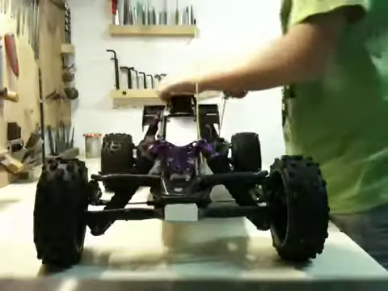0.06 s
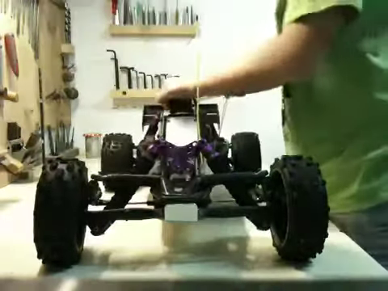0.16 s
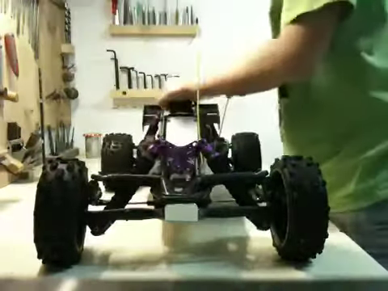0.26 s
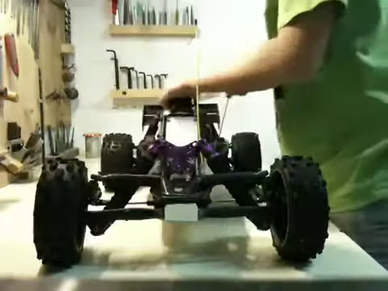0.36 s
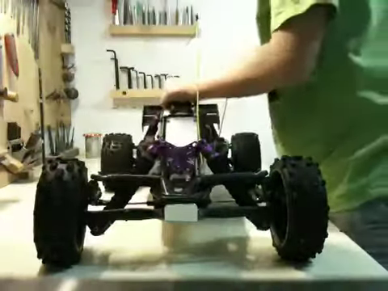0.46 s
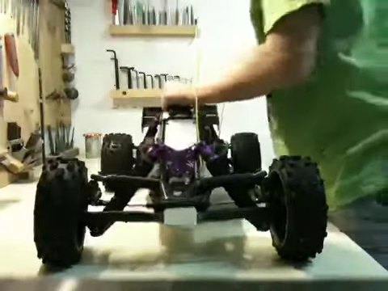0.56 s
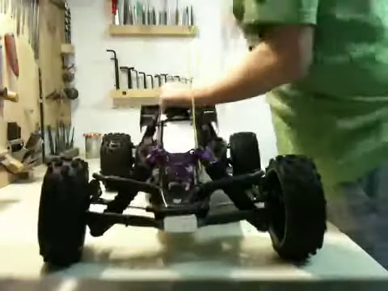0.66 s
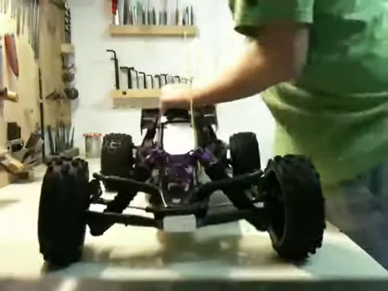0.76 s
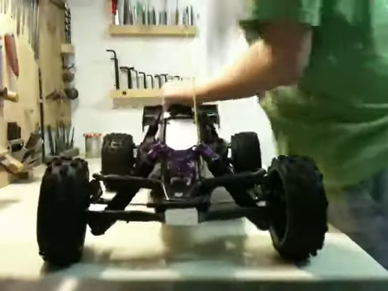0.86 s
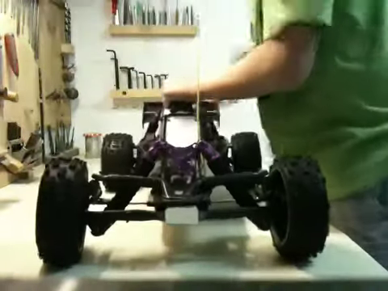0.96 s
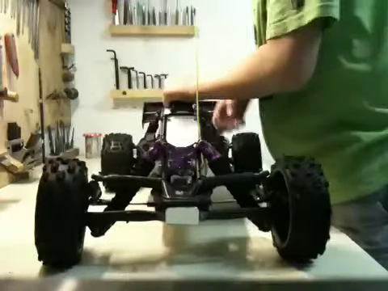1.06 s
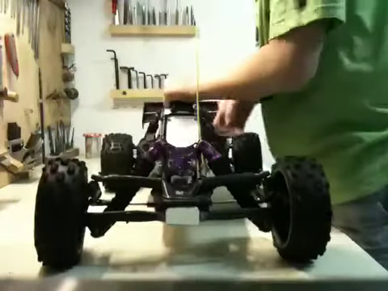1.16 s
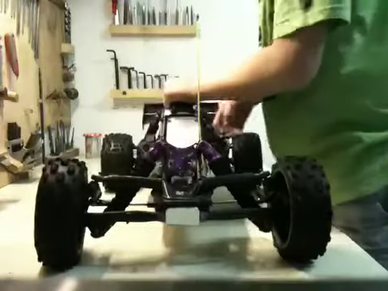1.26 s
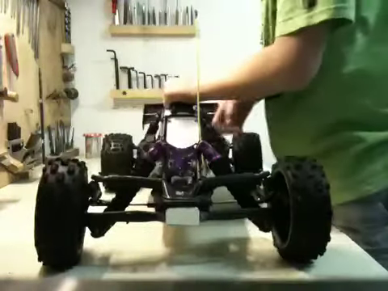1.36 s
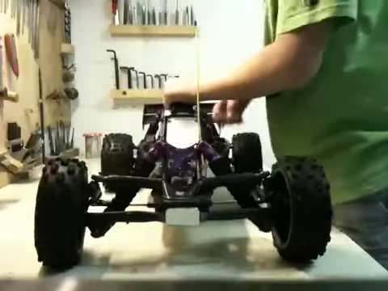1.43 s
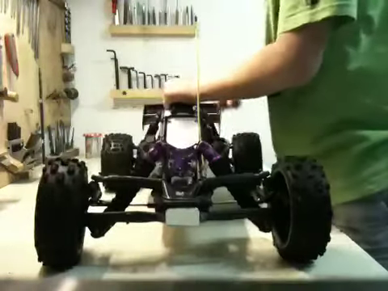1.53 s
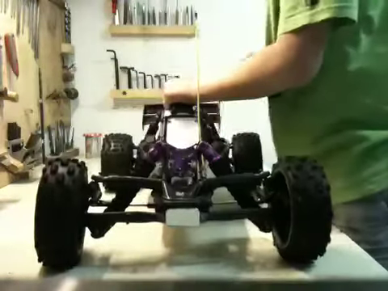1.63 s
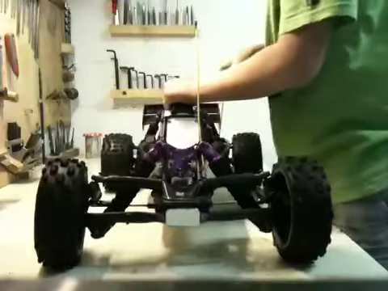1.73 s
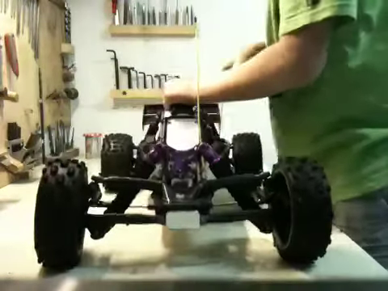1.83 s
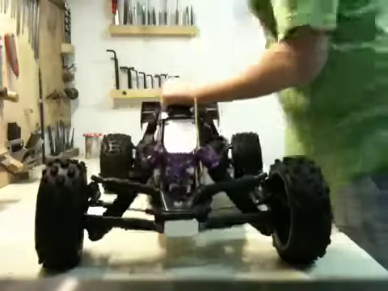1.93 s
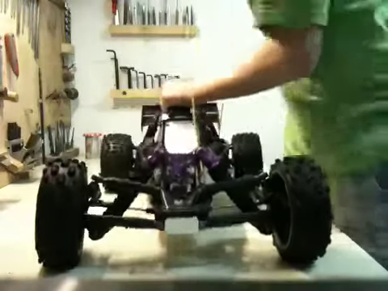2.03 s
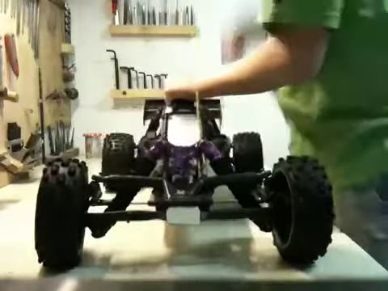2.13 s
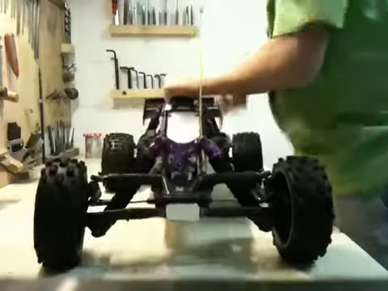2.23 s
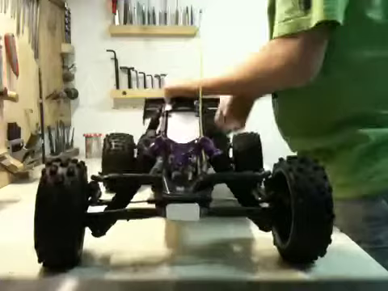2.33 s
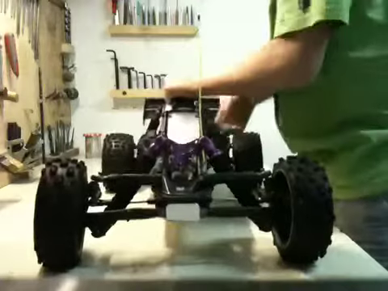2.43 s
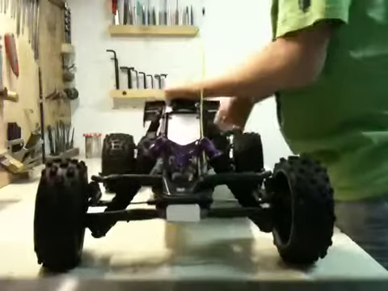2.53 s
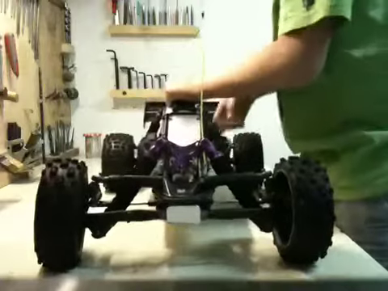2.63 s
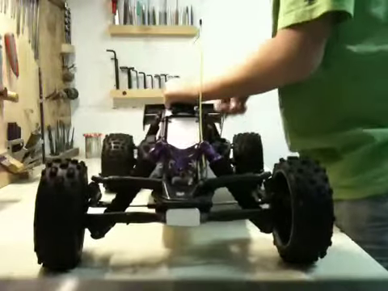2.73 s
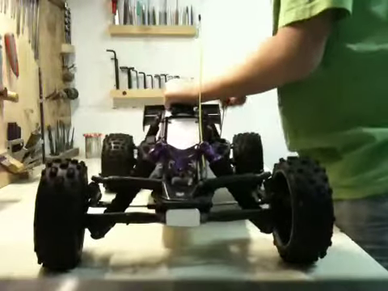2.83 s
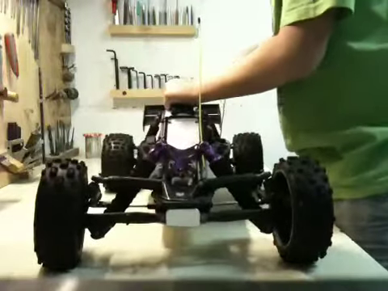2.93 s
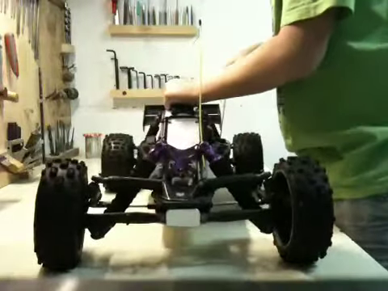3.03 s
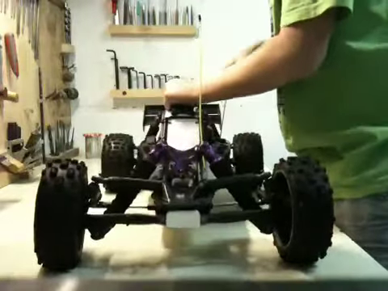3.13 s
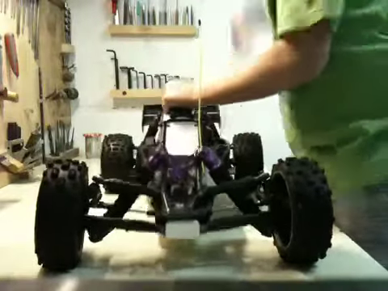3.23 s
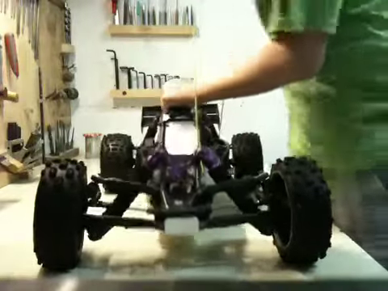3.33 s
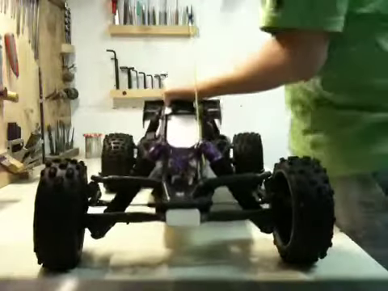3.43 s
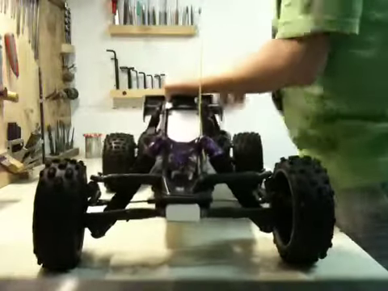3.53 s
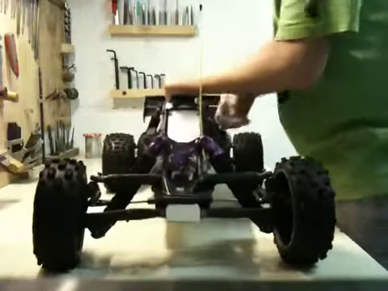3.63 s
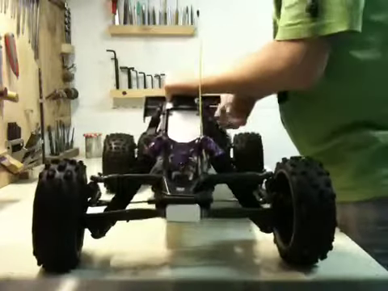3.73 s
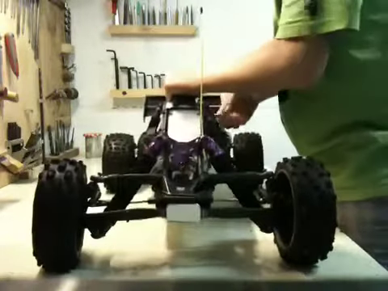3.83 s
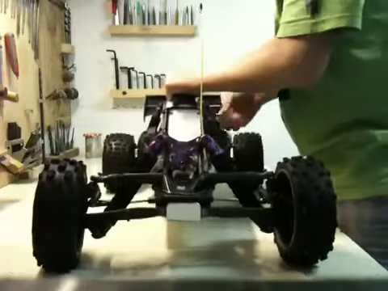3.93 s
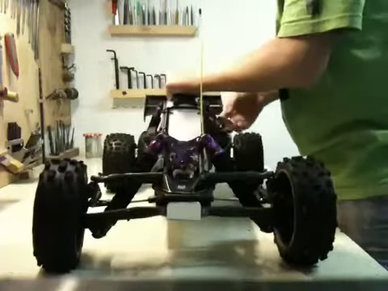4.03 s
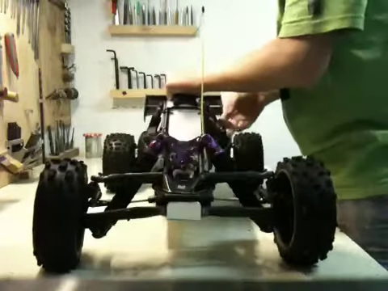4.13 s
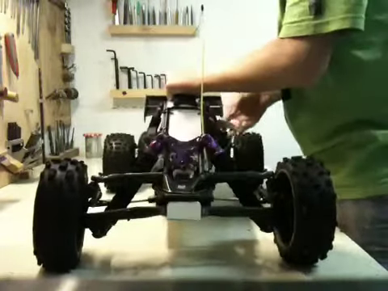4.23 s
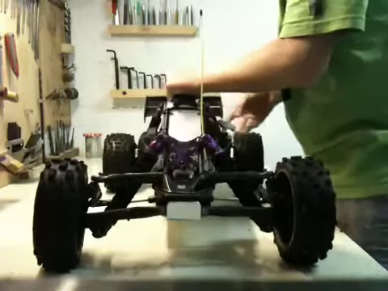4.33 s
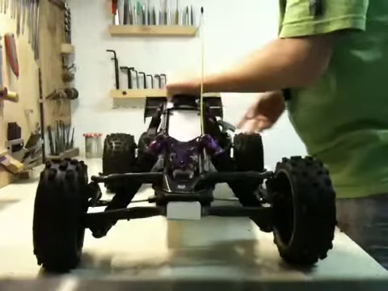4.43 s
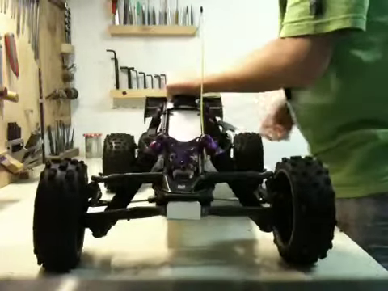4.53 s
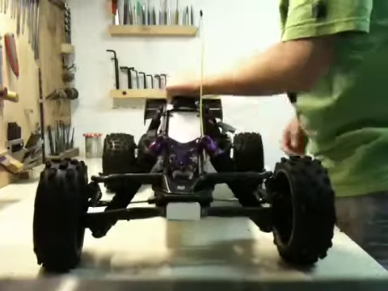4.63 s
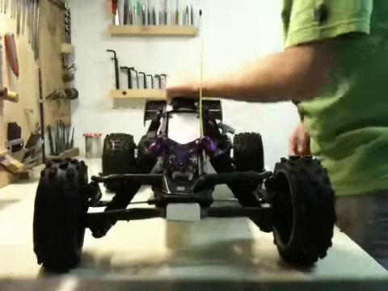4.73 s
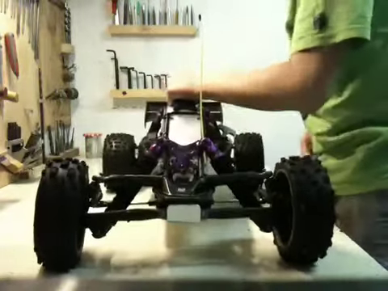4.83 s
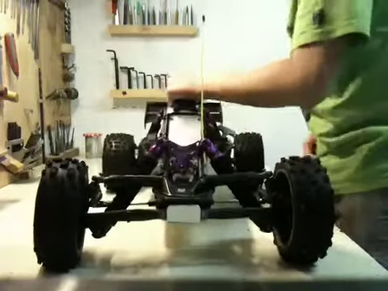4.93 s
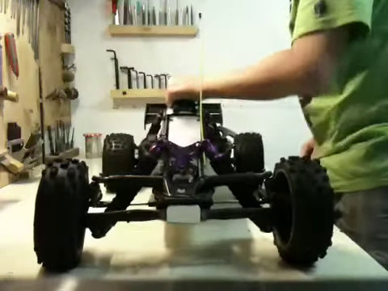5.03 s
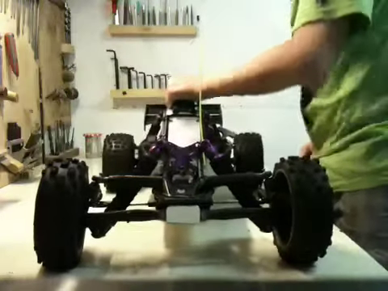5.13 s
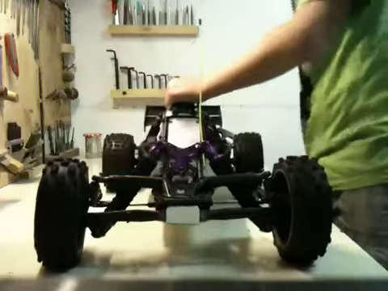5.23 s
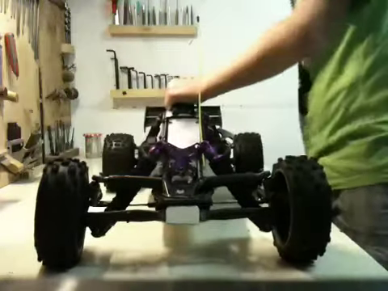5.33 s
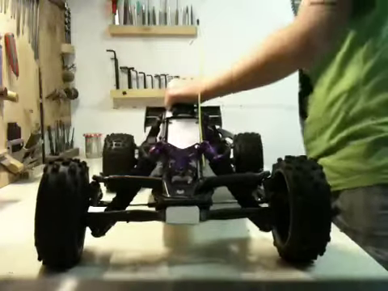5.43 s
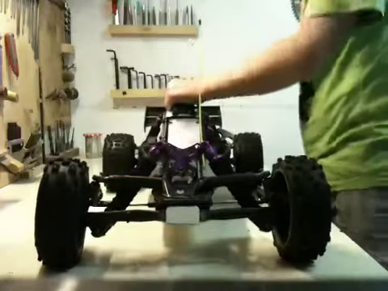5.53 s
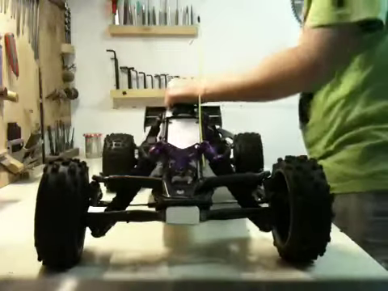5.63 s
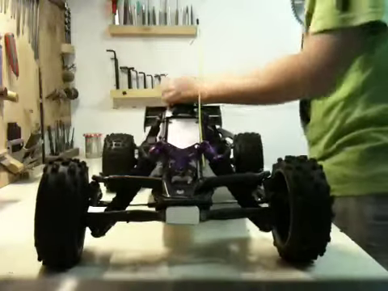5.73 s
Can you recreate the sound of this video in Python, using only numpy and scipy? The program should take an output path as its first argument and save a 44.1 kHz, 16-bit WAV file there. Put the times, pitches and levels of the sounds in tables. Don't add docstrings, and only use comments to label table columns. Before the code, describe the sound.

Handle clicks and cord rasps through two puffing pulls, then a third makes a small engine crackle, speed up and settle into uneven running.

```python
import sys
import numpy as np
from scipy import signal
from scipy.fft import rfft, irfft
from scipy.io import wavfile
from scipy.ndimage import uniform_filter1d

SR = 44100
rng = np.random.default_rng(int(sys.argv[2]) if len(sys.argv) > 2 else 0)


def dump(signal):
    limited = np.clip(np.atleast_2d(signal).T, -1, 1)
    pcm = np.round(limited * 32767).astype(np.int16)
    wavfile.write(sys.argv[1], SR, pcm)


def ratio_of_db(decibels):
    return 10 ** (np.asarray(decibels, float) / 20)


N = 254898
T = np.arange(N) / SR

# f/Hz, level/dB per Hz
HUSH = [(18, -52), (30, -22), (131, -12), (328, 0), (384, -6), (684, -4), (2060, -9), (3980, -14),
        (16000, -19)]
HUSH_DB = -69.5
# f/Hz, t60/s
ROOM = [(100, .55), (250, .48), (700, .42), (2000, .4), (6000, .3), (14000, .18)]

# t/s, length/s, f/Hz, level/dB
SPRING = [
    (.575, 0.091, 6300, -58),
    (3.225, 0.075, 6600, -55),
    (2.3, .05, 7000, -59),
]
# t/s, f/Hz, level/dB, t60/s
METAL_RINGS = [(.1, 3128, -52, .1), (.1, 4743, -57, .14), (1.415, 842, -54, .2), (1.535, 8021, -66, .6),
               (1.75, 2961, -56.5, .4), (1.735, 3635, -60, .3), (2.43, 2961, -56, .6),
               (2.785, 2961, -62, .7), (2.892, 2312, -56, .25), (3.08, 2961, -58, .7),
               (3.155, 800, -65, .2)]
# t/s, level/dB, main ring f/Hz, treble re that/dB, low knock re that/dB
CLICKS = [(0.099, -34.5, 700, -12.5, -12.5), (0.189, -45.5, 912, -12, -13), (0.204, -54, 670, -20, 1),
          (0.397, -70, 2070, -17, -21), (0.536, -60, 6940, 9, -27), (0.576, -47.5, 556, -2, -13),
          (0.603, -50, 7140, -11, -9), (1.154, -31.5, 1312, -22, -22), (1.415, -56, 850, -25, 5),
          (1.494, -47, 1700, -4, -12), (1.533, -35, 1900, -4, -22), (1.604, -39, 1120, -13, -28),
          (1.733, -31, 678, -11, -16), (1.947, -33, 1180, -10, -22), (2.568, -44, 1870, -27, -15),
          (2.585, -47, 1003, -23, -11), (2.644, -56, 732, -26, 15.5), (2.751, -41.5, 1620, -10, -19),
          (2.781, -33.5, 2380, -6, -24), (2.845, -47, 697, 2, -20), (2.892, -39, 2250, -24, -24),
          (2.998, -47, 630, -24, -19), (3.051, -33.5, 650, -10.5, -24), (3.225, -45, 7000, 2, -10)]
# f/Hz, width/Hz, level/dB
HOUSING = [(1310, 250, -5), (2100, 140, 7), (2615, 290, 0), (3150, 110, 7.5), (4670, 420, -5.5),
           (5300, 190, 9), (7000, 500, -2)]

# f/Hz, level/dB per Hz
RUB = [(240, -8.5), (400, -7.5), (504, -18), (553, -5), (1010, -10.5), (1650, -10), (2750, -16.5),
       (3020, -16), (4580, -28), (5190, -26.5), (16000, -48.5)]
SLACK_S = [
    .575,
    1.94,
    3.222,
]
SLACK_TREBLE_DB = [-4.5, -20, -3]
# yank t/s, top level/dB, swell/s, fade/dB per s
PULLS = [
    (0.742, -25.5, 0.11, 85),
    (2.007, -24, 0.085, 75),
    (3.328, -24, 0.073, 87),
]
SLACK_DB, BITE_DB, BITE_S = -24.5, -6, 0.041
PULL_TREBLE_DB, COAST_TREBLE_DB, DULLING_DB_PER_S = -9, -5.5, 25
# t/s, hold/s, level/dB, treble re that/dB
BRUSHES = [
    (1.402, 0.033, -49, -23),
    (1.49, 0.14, -56.5, -1),
    (2.293, 0.093, -46, 0),
    (2.565, 0.016, -47.5, -16),
    (2.64, 0.06, -48, -21),
    (2.75, .12, -53.5, -2),
]
BRUSH_RISE_S, BRUSH_FADE_DB_PER_S = 0.018, 151

# t/s, speed/turns per s
SPEED = [(3.3, 35.5), (3.49, 38), (3.65, 42.9), (3.89, 58.9), (3.97, 62.9), (4.29, 75.8), (4.37, 78.5),
         (4.53, 79.3), (4.69, 84.4), (4.85, 91.1), (4.93, 92.1), (5.09, 93.5), (5.17, 92.9), (5.55, 92.1),
         (5.65, 94.2), (5.78, 94.2)]
# f/Hz, width/Hz, top level/dB rms
DRONE = [(92.7, 6.7, -38.5), (178, 22, -26), (226.4, 50, -20.5), (255.7, 55, -24), (324, 40, -31),
         (378, 38, -30.5), (407, 27, -30.5), (555, 69, -26.5), (623, 92, -30.5), (741, 40, -21.5),
         (900, 33, -33), (942, 79, -28.5), (1083, 150, -32), (1610, 560, -39.5)]
# t/s, level/dB, pitch f/Hz
JOLTS = [(.745, -16, 230), (.779, -13, 221), (.812, -13, 227), (.836, -18, 277), (.892, -20, 193),
         (.931, -20, 210), (.954, -23.5, 213), (2.007, -14.5, 224), (2.043, -11.5, 214), (2.068, -16, 324),
         (2.096, -12, 200), (2.134, -15, 300), (2.15, -21.5, 195), (2.172, -14, 224), (2.224, -18, 207),
         (2.349, -25, 245), (2.401, -30, 210), (2.428, -28, 203.7), (3.273, -39, 178), (3.299, -27, 217)]
# first puff t/s, level/dB, fade/dB per s
COASTS = [
    (.99, -34, 66),
    (2.255, -26, 72),
]
COAST_GAP_S, COAST_HZ, COAST_UNEVEN_DB = 0.025, 228, -1.5
SPIN_DB, SPIN_HZ = -19.5, 294
# f/Hz, width/Hz, level/dB
CASE = [(179, 57, -5), (214, 24.3, 8.5), (274, 22, -2.5), (313, 65, -4.5)]
# f/Hz, width/Hz, level/dB
PIPE_LOW = [(187.6, 59, -5.5), (230, 33, 0), (288, 41, -2.5), (332, 50, -1), (406.7, 52.6, -1.5)]
# f/Hz, width/Hz, level/dB
PIPE_HIGH = [(548.6, 55, -2), (660, 97, -0.5), (738, 71, 0), (850, 77, -3.5), (922, 74, -6.5),
             (1138, 160, -4), (1306, 326, -8), (1775, 240, -12)]
# f/Hz, level/dB per Hz
RATTLE = [(530, -36), (900, -4), (1230, -5), (1420, -38), (1700, -38), (1830, -10), (1990, -5.5),
          (3730, -14), (6250, -13), (10100, -18.5), (16000, -34)]
# level when it catches/dB, level at idle/dB, bend of the growth (0: idle level throughout),
# gain/dB per dB of recent burning
AIR_LOW = (-18.5, -21, 1, 0.1567)
AIR_HIGH = (-31.5, -19, 0, 0.13)
SHAKE = (-34.5, -22, 1, 0.28)
BURN_MEMORY_S = 0.061
# t/s, crack level/dB
FIRINGS = [(3.5333, -11.5), (3.6057, -14.5), (3.656, -10.5), (3.722, -8.5), (3.7831, -6), (3.8368, -4),
           (3.889, -4.5), (3.9543, -8), (4.0147, -6.5), (4.073, -10), (4.1179, -9), (4.2443, -9),
           (4.2837, -5.5), (4.322, -7), (4.3597, -5), (4.525, -7.5), (4.5629, -2.5), (4.612, -7.5),
           (4.7299, -9), (4.7763, -5), (4.8212, -4.5), (4.8649, -4), (4.9078, -7), (4.951, -11),
           (5.0262, -10), (5.0701, -4.5), (5.2837, -9.5), (5.5433, -7.5), (5.5958, -8.5), (5.7128, -9.5)]
HALF_BURNS_S = [4.2011, 4.487, 5.2096, 5.3389, 5.427, 5.5006, 5.6689]
HALF_BURN_DB = -15.5
# f/Hz, level/dB per Hz
CRACK = [(600, -14), (1100, -2), (1900, -4), (2500, -2), (3100, 0), (3700, -5), (4400, -10), (5500, -10),
         (7000, -17), (13500, -26), (16000, -33)]
CRACK_TREBLE_DB = (-22, -18)
LOPSIDED = 0.091


def evened(x):
    return x / np.sqrt(np.mean(x ** 2) + 1e-20)


def read(points, hz):
    f, value = np.transpose(points)
    return np.interp(np.log(hz + 1), np.log(f + 1), value)


def add(mix, s, sound):
    part = mix[round(s * SR):][:len(sound)]
    part += sound[:len(part)]


def highpass(x, order, hz):
    return signal.sosfilt(signal.butter(order, hz, "high", fs=SR, output="sos"), x)


def hiss(points, size=N):
    hz = np.fft.rfftfreq(size, 1 / SR)
    z = rfft(rng.standard_normal(size)) * ratio_of_db(read(points, hz))
    top = 1 / (1 + (4500 / (hz + 1)) ** 6)
    return evened(irfft(z * (1 - top), size)), evened(irfft(z * top, size))


def ring(x, modes):
    out = np.zeros(len(x))
    for k, (hz, width, db) in enumerate(modes):
        out += (-1) ** k * ratio_of_db(db) * signal.lfilter(*signal.iirpeak(hz, hz / width, SR), x)
    return out


def flicker(width_s, depth_db):
    size = max(int(width_s * SR), 2)
    return ratio_of_db(depth_db * evened(uniform_filter1d(rng.standard_normal(N), size)))


def patchy(x, depth_db, bins, frames):
    z = signal.stft(x, nperseg=256, noverlap=192)[2]
    field = uniform_filter1d(rng.standard_normal(z.shape), bins, 0)
    field = evened(uniform_filter1d(field, frames, 1))
    patched = signal.istft(z * ratio_of_db(depth_db * field), nperseg=256, noverlap=192)[1]
    return evened(patched[:len(x)])


def hush():
    hz = np.fft.rfftfreq(N, 1 / SR)
    floor = evened(irfft(rfft(rng.standard_normal(N)) * ratio_of_db(read(HUSH, hz)), N))
    return ratio_of_db(HUSH_DB) * flicker(0.07, 0.27) * floor


def room(x):
    taps = np.zeros(SR)
    at = np.arange(200, SR - 20, 20)
    taps[at + rng.integers(0, 20, len(at))] = rng.choice([-1., 1.], len(at))
    hz, t, z = signal.stft(taps, SR, nperseg=512)
    decay = ratio_of_db(-60 * t / read(ROOM, hz)[:, None])
    tail = signal.istft(z * decay, SR, nperseg=512)[1]
    return signal.fftconvolve(x, tail / np.linalg.norm(tail))[:N]


def spring():
    out = np.zeros(N)
    for s, length, hz, db in SPRING:
        noise = rng.standard_normal(8000)[:int(length * SR)]
        band = evened(ring(noise, [(hz, 1200, 0)]))
        add(out, s, ratio_of_db(db) * band * signal.windows.tukey(len(noise), .3))
    return out


def metal_rings():
    out, t = np.zeros(N), T[:20000]
    for s, hz, db, t60 in METAL_RINGS:
        decay = ratio_of_db(db - 60 * t / t60) * np.clip(t / 0.0045, 0, 1)
        add(out, s, decay * np.sin(2 * np.pi * hz * t))
    return out


def clicks():
    out, t = np.zeros(N), T[:4000]
    dull, bright = hiss([(150, -9), (400, 1.5), (700, 4.5), (2000, 6.0), (5000, -2), (9000, -9.5), (16000, -31)])
    for s, db, hz, treble_db, low_db in CLICKS:
        at = round(s * SR)
        burst = (.5 * dull + ratio_of_db(treble_db) * bright)[at:at + len(t)] * np.exp(-t / 0.019)
        own = .4 * np.sin(2 * np.pi * hz * t) * np.exp(-t / .005)
        knock = ratio_of_db(low_db + 12) * np.sin(2 * np.pi * min(hz, 700) * t) * np.exp(-t / 0.0082)
        add(out, s - .001, ratio_of_db(db - 7) * np.clip(t / 0.0027, 0, 1) * (burst + own + knock))
    return ratio_of_db(-2.5) * out + ratio_of_db(-1) * ring(out, HOUSING)


def cord():
    dull, bright = (patchy(part, 3.2, bins=4, frames=5) for part in hiss(RUB))
    out = np.zeros(N)
    for slack, slack_treble_db, (yank, top_db, swell, fade_db) in zip(SLACK_S, SLACK_TREBLE_DB, PULLS):
        s = np.array([slack, yank - BITE_S, yank, yank + swell, yank + swell + 1])
        db = top_db + np.interp(T, s, [SLACK_DB, SLACK_DB, BITE_DB, 0, -fade_db])
        let_go = s[3] + np.array([.15, 1.15])
        trebles_db = [slack_treble_db, PULL_TREBLE_DB, PULL_TREBLE_DB,
                      COAST_TREBLE_DB, COAST_TREBLE_DB - DULLING_DB_PER_S]
        treble_db = np.interp(T, [*s[1:4], *let_go], trebles_db)
        out += np.clip((T - slack) / 0.032, 0, 1) * ratio_of_db(db - 5) * (dull + ratio_of_db(treble_db) * bright)
    for s, hold, db, treble_db in BRUSHES:
        fade_db = BRUSH_FADE_DB_PER_S * np.maximum(T - s - hold, 0)
        rise = np.clip((T - s) / BRUSH_RISE_S, 0, 1)
        out += rise * ratio_of_db(db - 11 - fade_db) * (dull + ratio_of_db(treble_db) * bright)
    return out * flicker(.01, 2.3)


def crank():
    speed = np.interp(T, *np.transpose(SPEED))
    return speed, np.cumsum(speed * (T > SPEED[0][0])) / SR


def burns():
    return list(FIRINGS) + [(s, HALF_BURN_DB) for s in HALF_BURNS_S]


def pace():
    speed, kicks = crank()[0], np.zeros(N)
    keep = np.exp(-1 / (BURN_MEMORY_S * SR))
    for s, db in burns():
        kicks[round(s * SR)] = ratio_of_db(db)
    recent = uniform_filter1d(signal.lfilter([1], [1, -keep], kicks), size=1000)
    share = (speed - speed.min()) / np.ptp(speed)
    return share, 20 * np.log10(recent / 0.11 + 0.08)


def drone():
    speed, turns = crank()
    hz, width, db = np.transpose(DRONE)
    out = np.zeros(N)
    for k in range(1, 18):
        off = (k * speed[::256, None] - hz) / (width / 2)
        gain = np.interp(T, T[::256], (ratio_of_db(db) / (1 + off ** 2)).max(1))
        weak = ratio_of_db(-17) if k == 2 else ratio_of_db(-.028 * max(k - 3, 0) * (94 - speed))
        tone = np.sqrt(2) * np.sin(2 * np.pi * (k * turns + rng.random()))
        out += weak * gain * flicker(.06, .45) * tone
    return out * np.clip((T - 3.4) / .35, 0, 1)


def puff_rows():
    rows = list(JOLTS)
    for start, db, fade_db in COASTS:
        late, uneven, off = rng.uniform(-1.04, 1, (14, 3)).T
        after = (np.arange(len(late)) + 0.159 * late) * COAST_GAP_S
        puff_db = db - fade_db * after + COAST_UNEVEN_DB * uneven
        rows += zip(start + after, puff_db, COAST_HZ * (1 + 0.073 * off))
    spin = T[1:][np.diff(np.floor(crank()[1])) > 0]
    spin = spin[spin < FIRINGS[0][0] - .02]
    uneven, off = rng.uniform(-1.3, 1, (len(spin), 2)).T
    return rows + list(zip(spin + .002, SPIN_DB + 2.1 * uneven, SPIN_HZ * (1 + 0.21 * off)))


def cold_puffs():
    out, kick, t = np.zeros(N), np.zeros(N), T[:2600]
    for s, db, hz in puff_rows():
        phase = 2 * np.pi * hz * (t - .005)
        wave = np.cos(phase) + .22 * np.cos(2 * phase)
        add(out, s, ratio_of_db(db - 1.5) * (t / 0.0032) * np.exp(1 - t / 0.0034) * wave)
        add(kick, s + 0.00303, ratio_of_db(db) * np.exp(-t / 0.0052) * rng.standard_normal(len(t)))
    return out + ratio_of_db(21.0) * ring(kick, CASE) + ratio_of_db(3) * ring(kick, PIPE_HIGH)


def exhaust():
    share, burning_db = pace()
    air_db, upper_db, rattle_db = (cold_db + (idle_db - cold_db) * share ** bend + follow * burning_db
                                   for cold_db, idle_db, bend, follow in (AIR_LOW, AIR_HIGH, SHAKE))
    on = np.clip((T - SPEED[0][0]) / 0.03, 0, 1) ** 2
    turns = crank()[1]
    uneven = rng.standard_normal(400)[turns.astype(int)]
    opening = np.diff(np.floor(turns), prepend=0)
    puffs = evened(opening * np.tanh(uneven) * on)
    gate = ratio_of_db(1.5 * np.tanh(uneven)) * (1.5 + np.exp(-(turns % 1) / .3))
    air = evened(gate * on * rng.standard_normal(N))
    low = evened(ring(puffs + 0.76 * air, PIPE_LOW))
    high = evened(ring(puffs + 1.9 * air, PIPE_HIGH))
    dull, bright = hiss(RATTLE)
    rattle = patchy(gate * on * (dull + ratio_of_db(-5) * bright), 2.2, bins=5, frames=5)
    return on * (ratio_of_db(air_db - 5.5) * low + ratio_of_db(upper_db - 8.5) * high + ratio_of_db(rattle_db - 8.0) * rattle)


def firings():
    out, blast, t = np.zeros(N), np.zeros(N), T[:3000]
    dull, bright = hiss(CRACK)
    shape = np.clip(t / .001, 0, 1) * (np.exp(-t / .011) + 0.22 * np.exp(-t / 0.025))
    share = pace()[0]
    for s, db in burns():
        phase, detune = rng.random(2)
        at = round(s * SR)
        treble_db = np.interp(share[at], [0, 1], CRACK_TREBLE_DB)
        noise = (dull + ratio_of_db(treble_db + 12.0) * bright)[at:at + len(t)]
        sweep = (2500 + 300 * detune) * t + 110000 * t ** 2
        chirp = 0.61 * np.sin(2 * np.pi * (phase + sweep)) * np.exp(-((t - .003) / 0.0019) ** 2)
        add(out, s - .001, ratio_of_db(db - 7.5) * (shape[:len(noise)] * noise + chirp[:len(noise)]))
        add(blast, s + 0.002264, ratio_of_db(db) * np.exp(-t / 0.0095) * rng.standard_normal(len(t)))
    return out + ratio_of_db(16.0) * ring(blast, PIPE_HIGH)


def scene():
    engine = exhaust() + firings() + cold_puffs()
    bench = ratio_of_db(-0.5) * ring(engine, [(95, 19, 2.9)])
    engine = highpass(engine, 6, 155)
    hands = highpass(cord() + clicks(), 4, 190)
    close = engine + hands + spring()
    return (close + ratio_of_db(-8.0) * room(close) + bench + drone() + metal_rings() + hush())[None]


def low_pass(x):
    return signal.sosfilt(signal.butter(12, 16110, fs=SR, output="sos"), x)


def record(dry):
    thin = highpass(dry, 4, 78)
    thin = thin + LOPSIDED * highpass(thin ** 2, 1, 20)
    top = .72
    held = thin / (1 + abs(thin / top) ** 8) ** (1 / 8)
    band_limit = signal.firwin(511, 15950, window=("kaiser", 9), fs=SR)[None]
    finished = signal.oaconvolve(held, band_limit, "same")
    return low_pass(finished)


dry = scene()
out = record(dry)
dump(out)
```